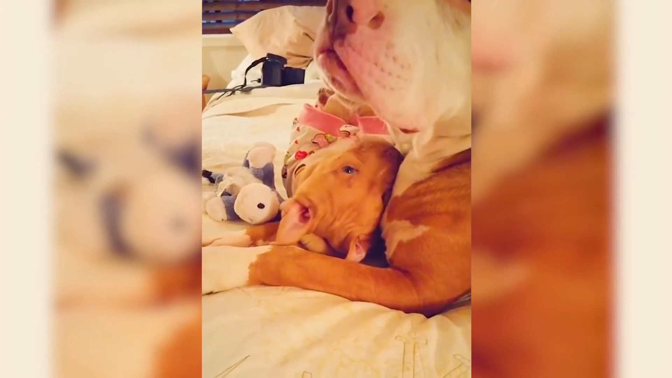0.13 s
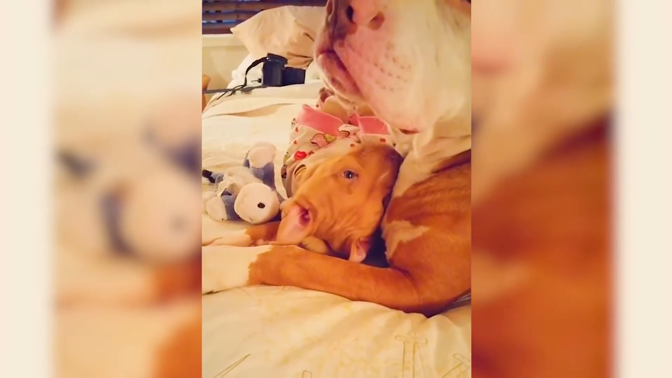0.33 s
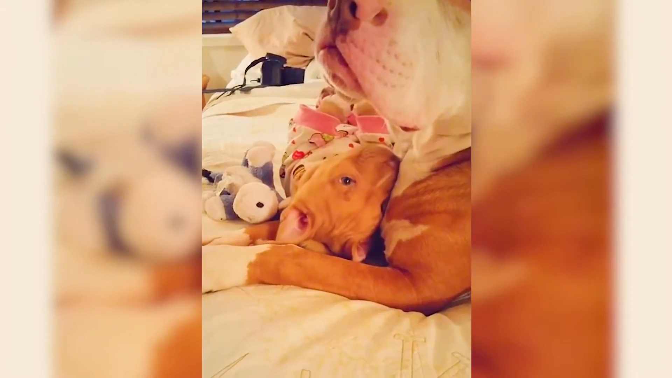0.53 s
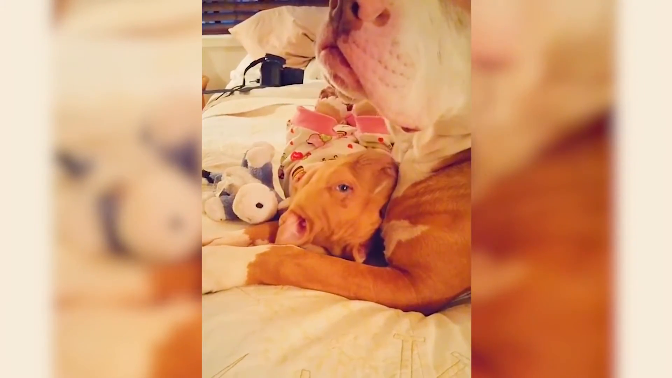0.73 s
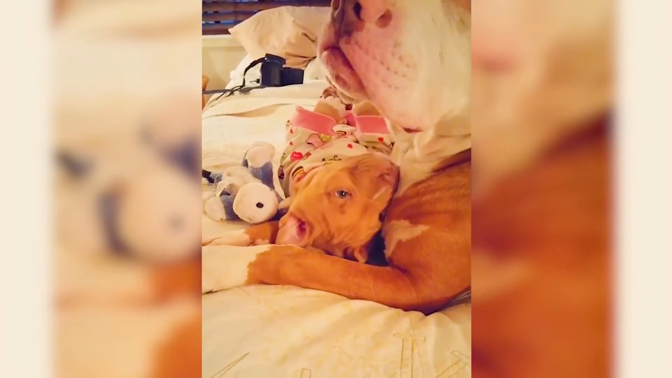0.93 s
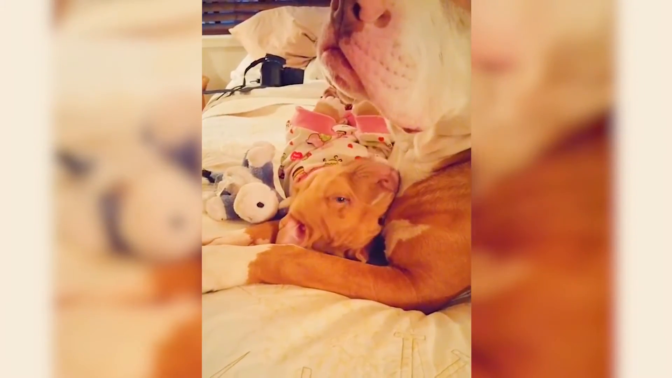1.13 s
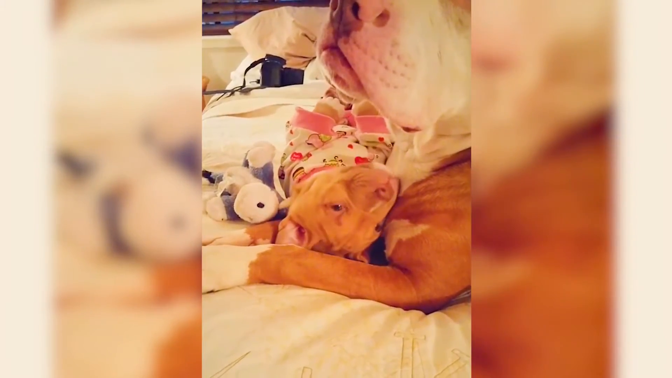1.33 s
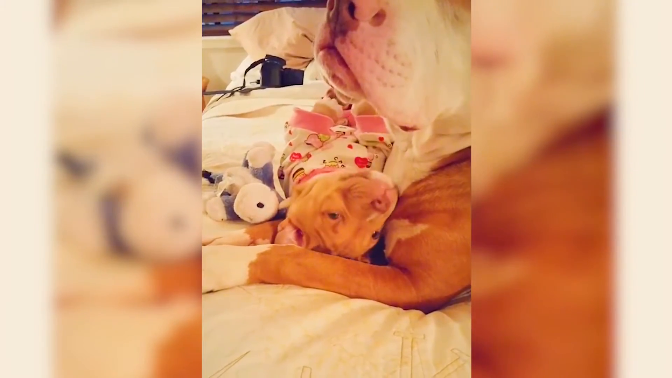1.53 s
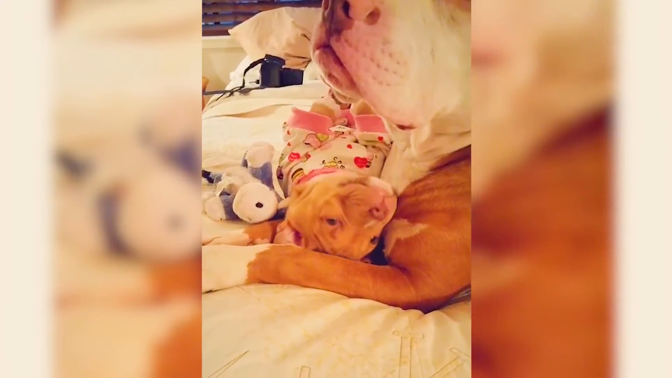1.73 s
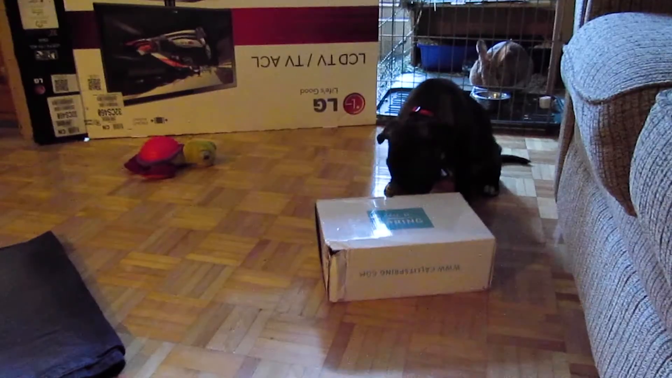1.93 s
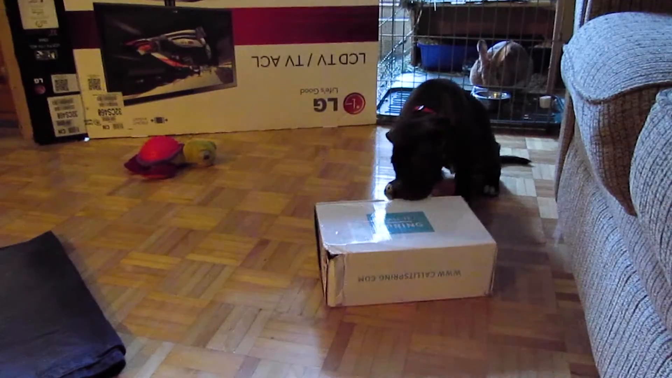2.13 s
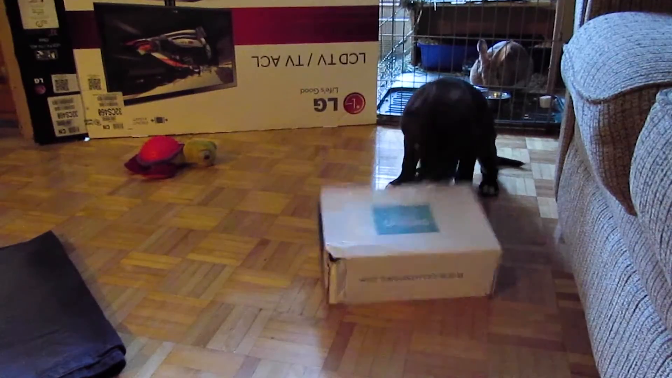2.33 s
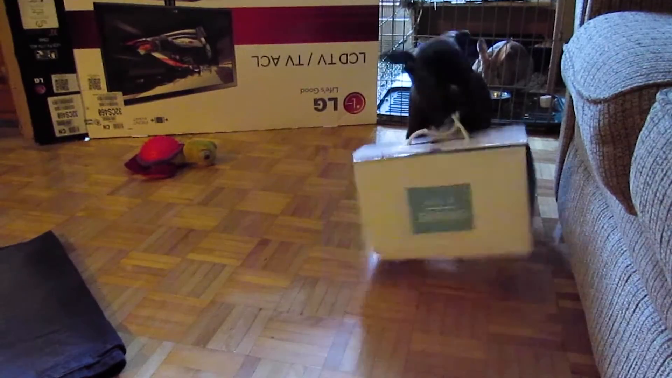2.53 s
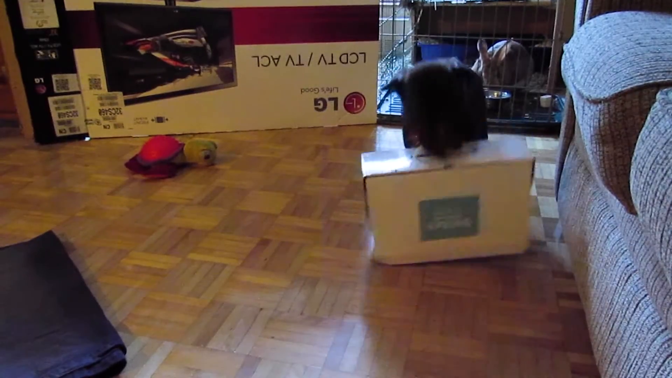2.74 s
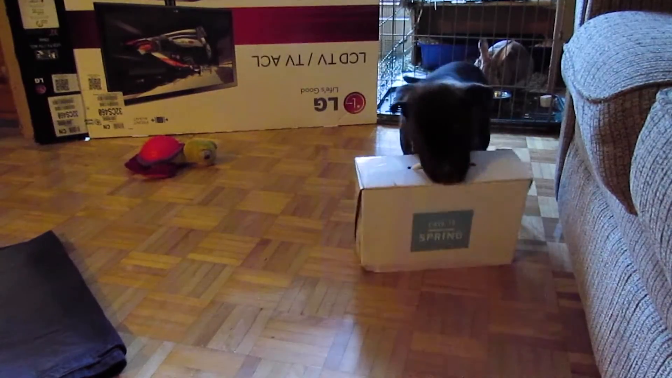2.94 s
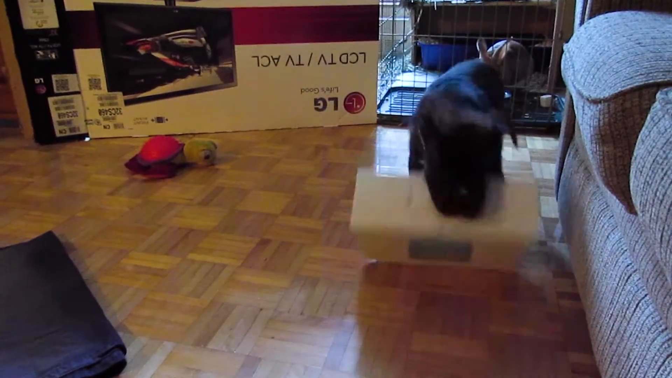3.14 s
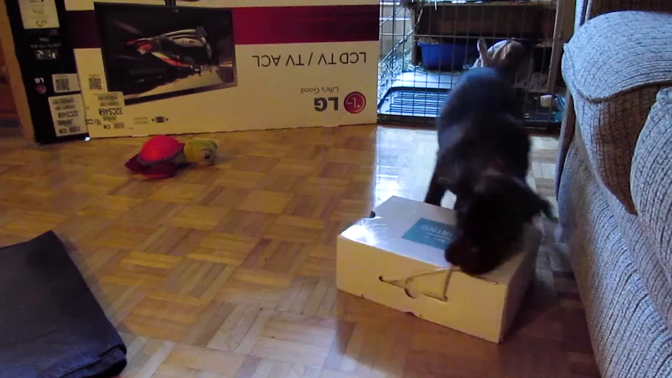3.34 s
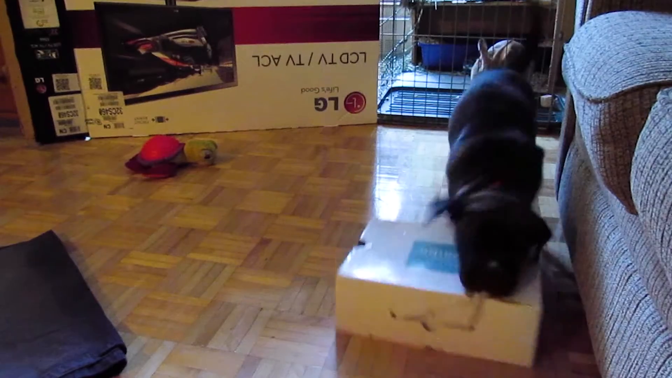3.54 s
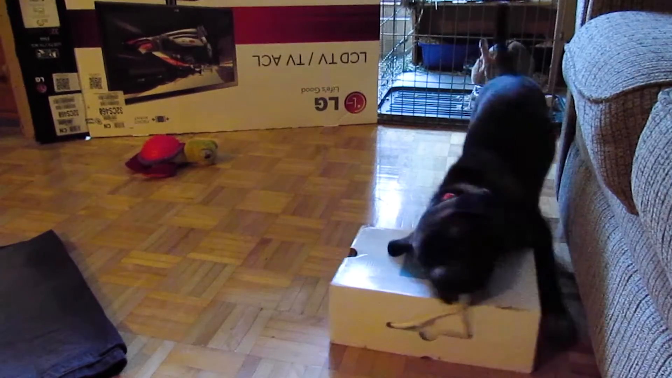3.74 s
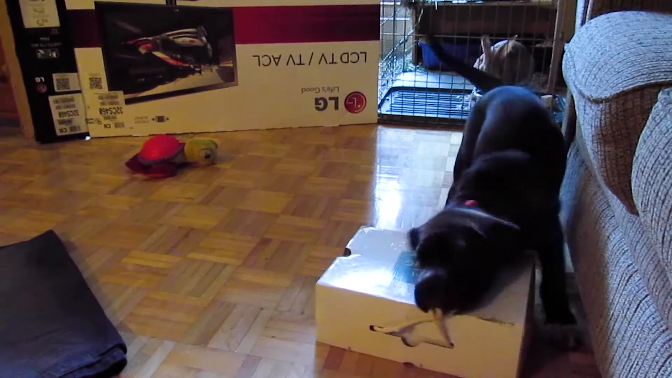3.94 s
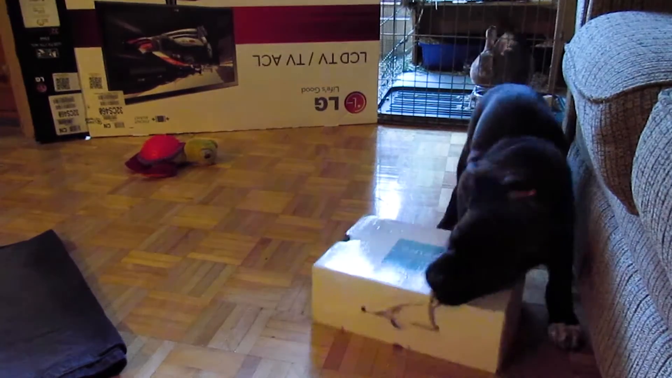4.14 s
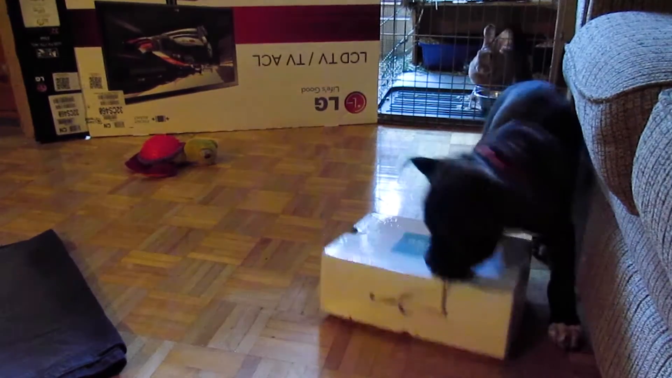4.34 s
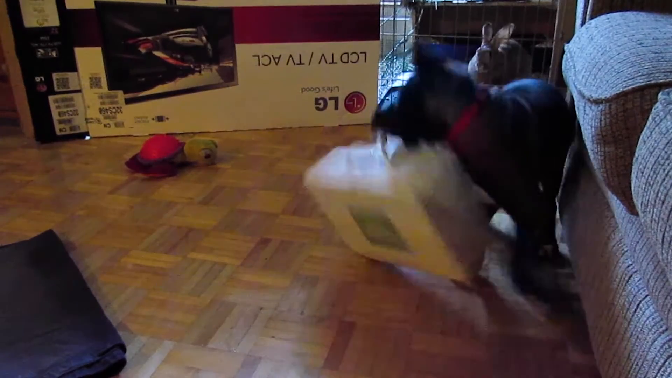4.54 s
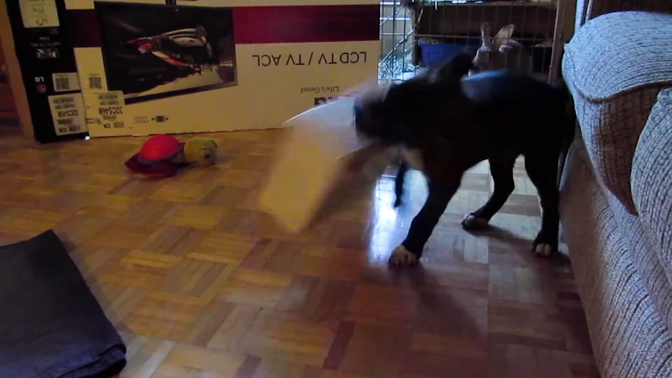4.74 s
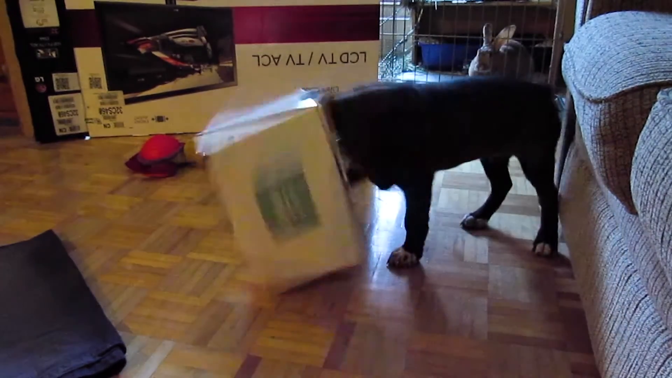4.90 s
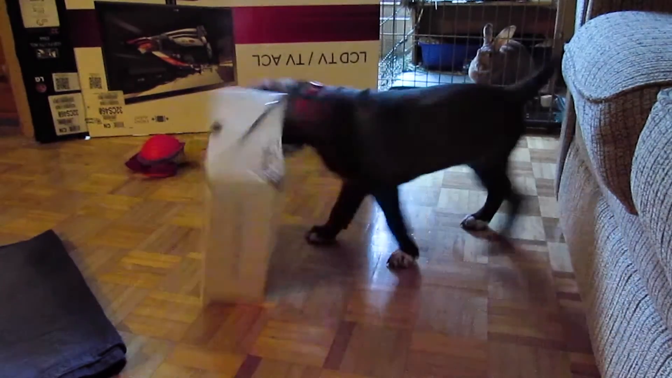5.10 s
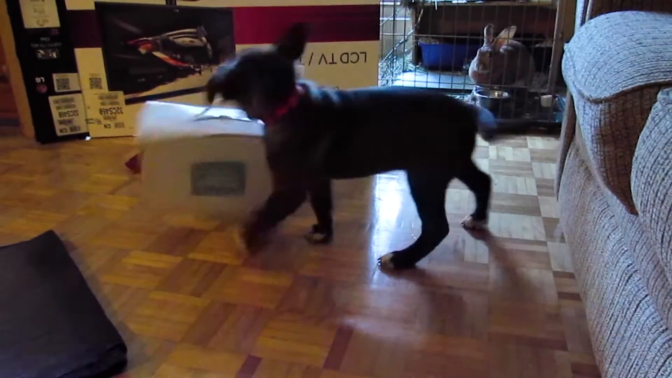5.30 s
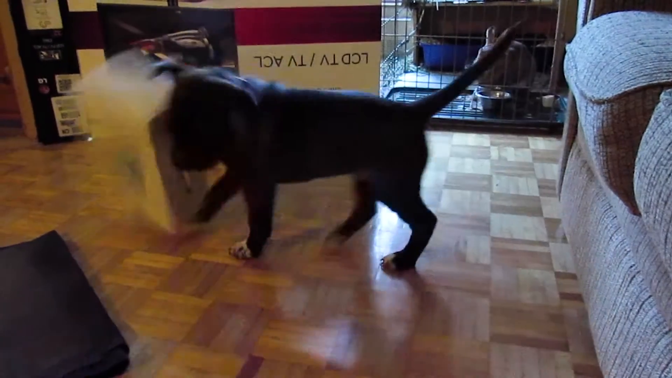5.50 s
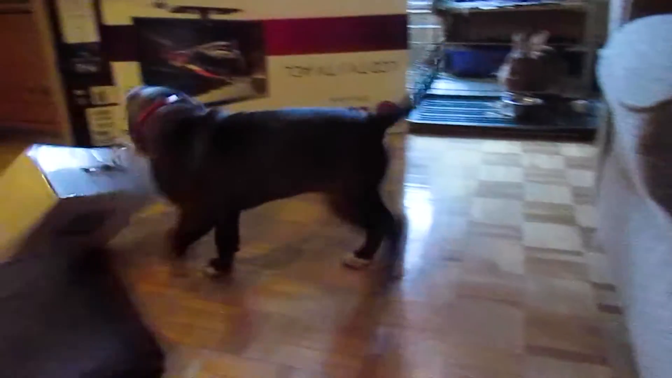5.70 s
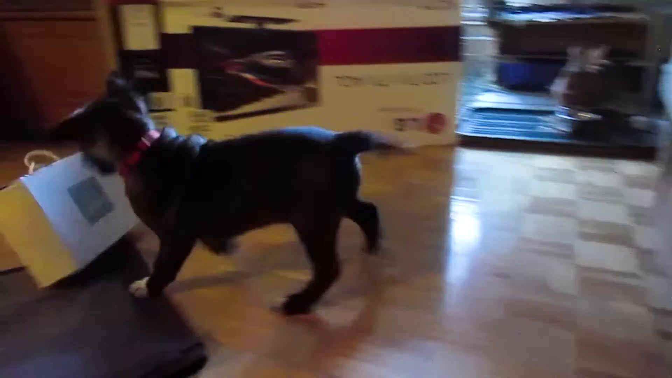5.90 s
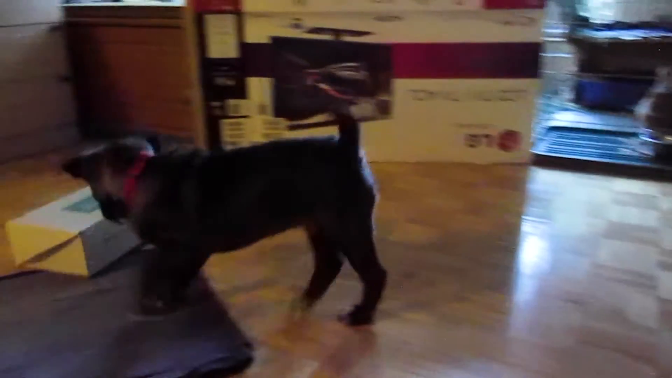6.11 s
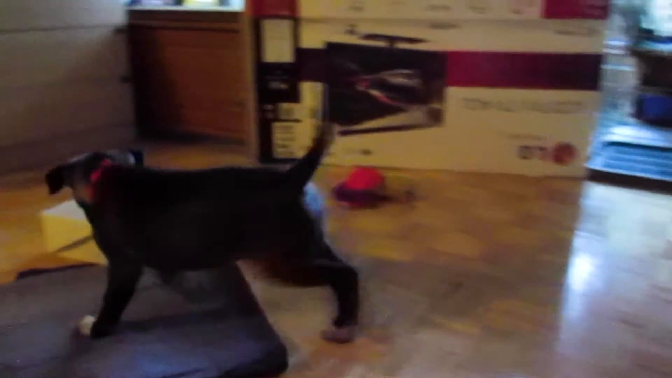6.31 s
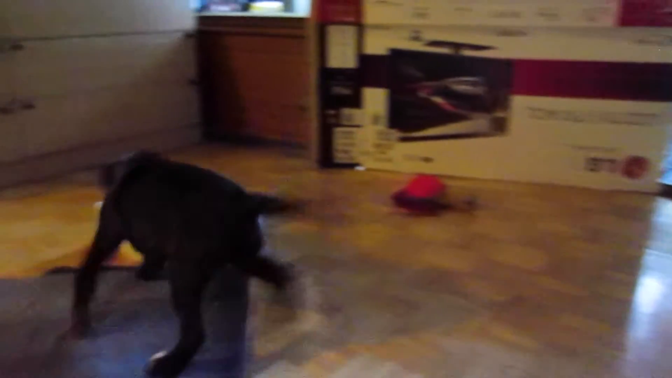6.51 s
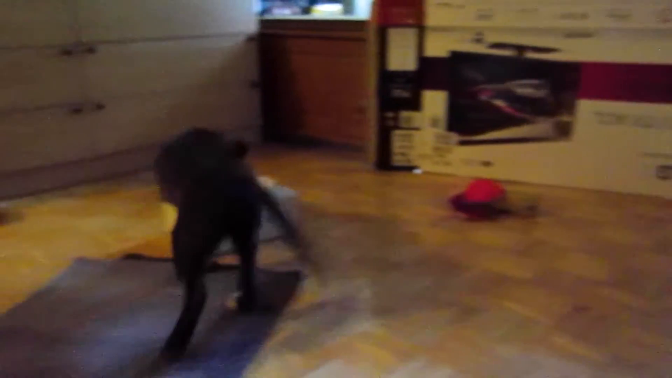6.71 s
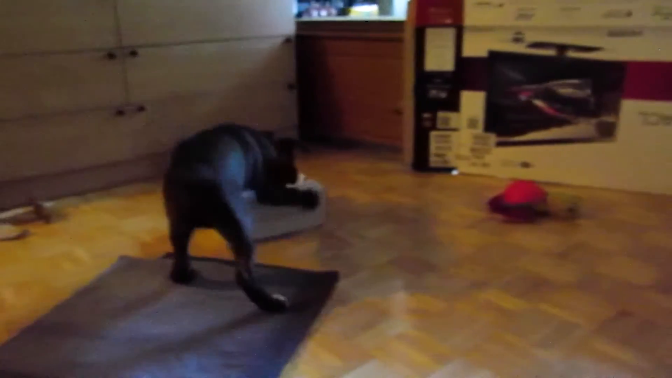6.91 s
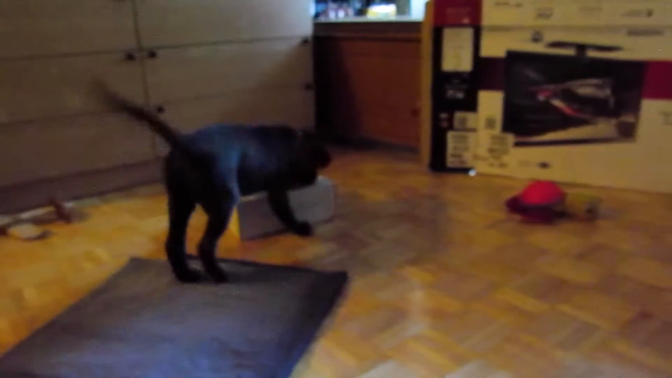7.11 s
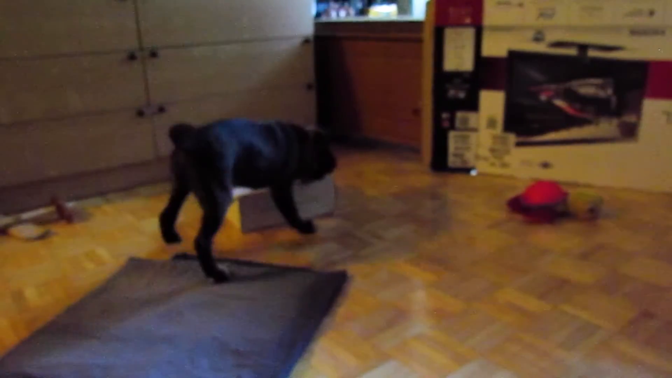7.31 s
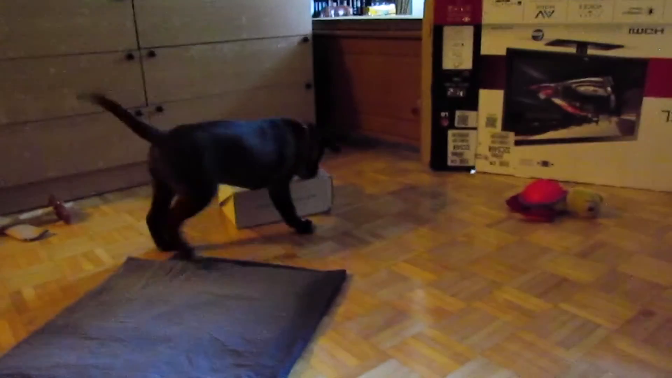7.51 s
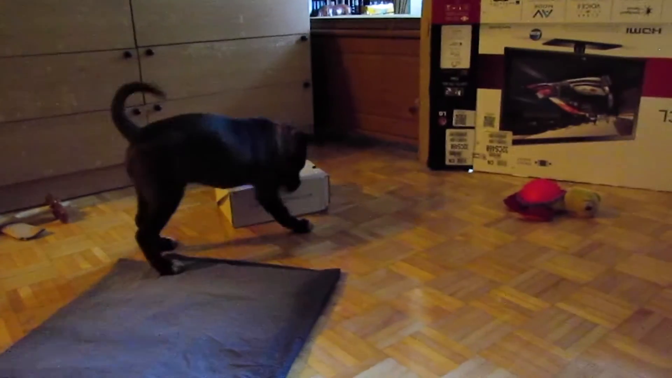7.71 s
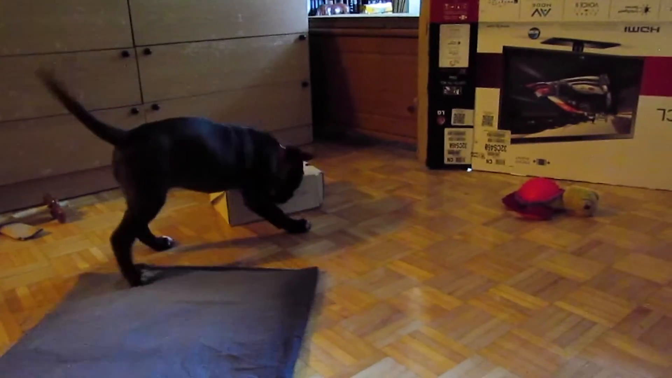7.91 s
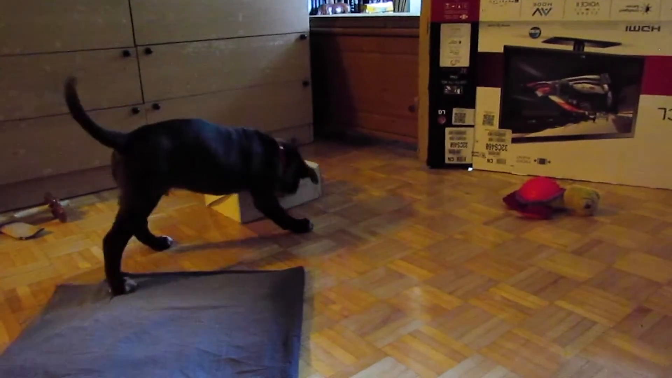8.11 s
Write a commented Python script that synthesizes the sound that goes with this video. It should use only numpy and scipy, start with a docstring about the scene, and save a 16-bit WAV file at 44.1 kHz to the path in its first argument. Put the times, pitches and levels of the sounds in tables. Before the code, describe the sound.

Near-silent room tone cuts to cardboard thumping and scraping over hard wooden floor, claws ticking sharply, bursts gradually thinning into scuffs.

```python
"""Puppy wrestling a cardboard box

A moment of quiet bedroom air, then a cut to a living room where a puppy wrestles a cardboard box over parquet.
Decaying modes, noise crunches and damped sines make the knocks; filtered ticks make the claws and flaps.
Grainy noise makes the rubbing and squeaks, high sines a collar tag, shaped noise the rumble and room air.
Noise tails that die band by band let the small room answer the blows and clicks."""
import sys
import numpy as np
from scipy import signal
from scipy.fft import rfft, irfft
from scipy.io import wavfile
from scipy.ndimage import uniform_filter1d

SR = 44100
rng = np.random.default_rng(int(sys.argv[2]) if len(sys.argv) > 2 else 0)


def transcribe(u):
    """Save the signal u as a 16-bit wav file named by the first command-line argument.

    u: samples, shape (n,) or (channels, n), limited to [-1, 1]; the rate is SR.
    q: integer samples, one column per channel.
    """
    v = np.clip(np.atleast_2d(u).T, -1, 1)
    q = np.round(v * 32767).astype(np.int16)
    wavfile.write(sys.argv[1], SR, q)


N = 359415

CUT_S = 1.812  # bedroom before, living room after
PORTS_HZ = 2360  # above this the two microphone ports hear diffuse sound differently


def undb(db):
    """Decibels to gain."""
    return 10 ** (np.asarray(db) / 20)


def unit(x):
    """Scale to rms 1."""
    return x / np.sqrt(np.mean(x ** 2))


def band(x, hz, width):
    """One resonance, gain 1 at the centre."""
    return signal.lfilter(*signal.iirpeak(hz, hz / width, fs=SR), x)


def fade(t, t60):
    """Envelope that falls 60 dB in t60 seconds."""
    return np.exp(-np.log(1000) * t / t60)


def attack(t, seconds):
    """Exponential rise towards 1 with this time constant."""
    return 1 - np.exp(-t / seconds)


def add(out, s, sound):
    """Mix a short sound in at time s."""
    i = int(s * SR)
    out[..., i:i + sound.shape[-1]] += sound[..., :N - i]


def walk(rate):
    """Random levels, drawn rate times a second and joined by slews; spread near 1."""
    k = int(SR / rate)
    held = np.repeat(rng.standard_normal(N // k + 1), k)
    return 1.2 * uniform_filter1d(held, k)[:N]


def diffuse(make, side_db):
    """Two ports close together: alike in the bass, partly unrelated in the treble."""
    side = signal.lfilter(*signal.butter(1, PORTS_HZ, "high", fs=SR), make())
    return make() + undb(side_db) * side * np.array([[1], [-1]])


def air(points, flicker_db):
    """Steady noise of a given colour, rms near 1, that flickers slightly."""
    hz, db = np.transpose(points)
    bins_hz = np.arange(N // 2 + 1) * SR / N
    shape = undb(np.interp(np.log(bins_hz + 1), np.log(hz), db))
    noise = irfft(rfft(rng.standard_normal(N)) * shape, N)
    return unit(noise) * undb(flicker_db * walk(8))


# Box against floor and paws. Each row: start in seconds, blow level in dB, thump pitch in Hz,
# thump, crunch and floorboard levels in dB relative to the blow, ring in seconds.
KNOCKS = [(2.504, -21, 250, -2, -28, -9, 0.09), (2.601, -13.5, 433, -20, 5, -15, 0.092),
          (2.638, -7, 557, -10, -8.5, -21.5, 0.095), (2.712, -22, 390, -17, 2.5, -26, 0.043),
          (2.821, 4.5, 460, -3.5, -13, -50, 0.034), (2.86, -2, 437, -10.5, -14, -23.5, 0.069),
          (2.999, -27.5, 420, -5, 4.5, -33, 0.081), (3.043, -23.5, 522, -3, -1, -28, .07),
          (3.146, -26, 610, -11, 2, -39, 0.1), (3.216, -6.5, 487, -12.5, -16.5, -33, 0.084),
          (3.259, -24, 468, -9, -10, -11, 0.051), (3.357, -3, 275, -6.5, -21, -37, .06),
          (3.373, -8.5, 320, -2, -4, -31, 0.033), (3.383, 0.5, 405, -6.5, -14.5, -47, 0.11),
          (3.451, -5, 204, 4, -14.5, -35, 0.078), (3.529, -15, 240, -12, -12.5, -24, 0.15),
          (3.59, -20, 563, 3, 0.5, -36, 0.037), (3.611, -22.5, 648, -4, 5, -33, .11),
          (3.63, -25.5, 600, -6, 2.5, -30, .06), (3.646, -21, 320, 0, -13, -13, 0.047),
          (3.678, -7, 330, -6, -15, -40, 0.068), (3.744, -25, 302, -3, -22, -26, .085),
          (3.777, -23.5, 337, 2, -1, -28, .062), (3.799, -18.5, 244, -1, -13, -32, 0.043),
          (4.151, -28.5, 335, -4.5, -26, -9, .12), (4.219, -19, 230, -5.5, -28, -22, 0.05),
          (4.489, -30, 150, -5, -21, -6, 0.076), (4.594, -12, 418, -7, -4.5, -20, 0.061),
          (4.685, -13, 147, -10, -12.5, -15.5, .11), (4.75, 5.5, 468, -5.5, -12, -34, 0.048),
          (4.847, -12.5, 383, -13, 0, -35, 0.059), (4.953, -1.5, 518, -12.5, -7.5, -22, 0.082),
          (5.021, -10, 164, -15, -15.5, -30, 0.12), (5.192, -8.5, 163, -8, -6, -18.5, 0.12),
          (5.288, -18, 450, -2, 1, -18, 0.044), (5.441, -4.5, 460, -20, -8.5, -30, .13),
          (5.5, -7.5, 460, -8, -19, -34, 0.038), (5.587, -1, 264, -15.5, -4.5, -14.5, 0.049),
          (5.712, -10.5, 237, -14, -18, -31, 0.099), (5.843, -24, 155, 0.5, -39, -18, 0.13),
          (5.888, -26.5, 590, -10, 3, -30, 0.047), (5.897, -16.5, 460, -6.5, -6.5, -24, 0.1),
          (6.058, -42.5, 390, -4, 3, -18, 0.13), (6.124, 1, 494, -8.5, -9, -40, 0.096),
          (6.131, -5, 256, -6.5, -8.5, -42, .04), (6.453, -35.5, 175, -5, 2, -34, .095),
          (6.736, -13.5, 276, -9.5, -27, -21, 0.098), (6.86, -31, 404, -6, -7, -30, .08),
          (6.924, -28.5, 363, -3.5, -27, -36, 0.18), (6.975, -24.5, 158, -0.5, -21, -14, 0.068),
          (7.846, -36.5, 173, 2.5, -25, -25, 0.077)]
# Walls and air of the box. Each row: mode in Hz, relative level in dB, t60 in seconds at a ring of 0.14 s.
BOX_MODES = [(150, -3.5, 0.12), (209.5, -1, 0.07), (268.3, 0, 0.16), (325, -1, 0.088), (361, -2, 0.12),
             (412, 4.5, 0.098), (460, -4.5, 0.096), (505.4, -19, 0.32), (588, -4, 0.14), (718, -26.5, 0.11),
             (753.5, -6, 0.098), (858, -6, 0.11), (1000, -6.5, 0.033)]
# Cardboard crunch above the clear modes. Each row: centre in Hz, width in Hz, relative level in dB.
CRUNCH_BANDS = [(400, 360, -10), (850, 270, -7.5), (1264, 520, -7), (2500, 590, -18)]
CONTACT_S, CRACK_S = 0.0018, 0.00054  # the crunch starts faster than the walls swing
BOARDS_HZ, BOARDS_T60_S = 94.3, 0.33


def crunch_noise(t, ring):
    """Crumpling cardboard: banded noise whose level jumps in fits as loose flaps rattle."""
    fits = undb(3.4 * np.repeat(rng.standard_normal(len(t) // 150), 150))
    crunch = np.zeros(len(t))
    for hz, width, db in CRUNCH_BANDS:
        noise = band(fits * rng.standard_normal(len(t)), hz, width)
        crunch += undb(db) * unit(noise * fade(t, ring))
    # unit() lifts short bursts; the root evens out their starting level
    return crunch * np.sqrt(0.14 * ring) * attack(t, CRACK_S)


def knocks():
    """Each blow: a thump of the struck panel, the box modes in a new mix, a crunch and a boom of the floorboards."""
    out, thumps = np.zeros(N), np.zeros(N)
    t = np.arange(SR // 2) / SR
    hz, mode_db, t60 = (c[:, None] for c in np.transpose(BOX_MODES))
    contact = attack(t, CONTACT_S)
    boards = np.sin(2 * np.pi * BOARDS_HZ * t) * fade(t, BOARDS_T60_S) * attack(t, 0.0022)
    for s, db, thump_hz, thump_db, crunch_db, boards_db, ring in KNOCKS:
        # random detune, phase and level of every mode
        detune, phase, level = rng.standard_normal((3, len(BOX_MODES), 1))
        swing = np.sin(2 * np.pi * hz * (1 + 0.032 * detune) * t + 2 * phase)
        modes = np.sum(undb(mode_db + 2.9 * level) * swing * fade(t, t60 * ring / 0.14), axis=0)
        box = undb(-17) * contact * modes + undb(crunch_db) * crunch_noise(t, ring)
        add(out, s, undb(db) * (box + undb(boards_db) * boards))
        # a few cycles, then the paw damps it
        thump = np.sin(2 * np.pi * thump_hz * t) * np.exp(-(t / (0.16 * ring)) ** 2)
        add(thumps, s, undb(db + thump_db) * contact * thump)
    return out, thumps


# Claws on parquet and snapping flaps. Each row: start in seconds, level in dB, centre in Hz,
# t60 of the rattle in seconds.
CLICKS = [(1.865, -45, 9000, 0.013), (2.4125, -26, 2710, .035), (2.467, -25, 3990, 0.046),
          (2.494, -22, 2760, 0.042), (2.555, -33, 7380, .024), (2.604, -1.5, 2460, 0.063),
          (2.6388, 1.5, 2000, 0.032), (2.7134, -27, 2000, .03), (2.8221, -10, 2000, .047),
          (2.8603, -8, 2700, 0.11), (3.0005, -16, 2090, 0.028), (3.046, -11, 3080, 0.023),
          (3.13, -22, 3100, .079), (3.147, -13.5, 2560, 0.054), (3.279, -20, 9910, .027),
          (3.3561, -11.5, 2580, .04), (3.379, -3, 2760, 0.022), (3.3875, -16, 2760, 0.026),
          (3.4334, -11, 2540, 0.026), (3.6107, -6, 2260, 0.014), (3.68, -15.5, 2020, .033),
          (3.7761, -13.5, 2290, 0.034), (3.813, -20, 3530, 0.045), (4.5928, -9, 2250, 0.061),
          (4.661, -16, 3540, .03), (4.684, -12, 2410, 0.024), (4.7534, 0.5, 2100, 0.013),
          (4.8477, 2.2, 2530, 0.0091), (4.907, -9, 2240, 0.025), (4.9528, -3.5, 2820, 0.039),
          (5.027, -2, 1890, 0.0081), (5.1917, 3.5, 3930, 0.016), (5.2912, 3.5, 2370, 0.012),
          (5.4392, -10.5, 2380, 0.21), (5.5, -18, 11000, 0.022), (5.5424, -21, 10400, .028),
          (5.5877, 1, 2000, 0.057), (5.7082, -13.5, 2060, .022), (5.8883, -18, 2960, 0.066),
          (6.1228, 0, 2020, 0.029), (6.2775, -17, 2000, 0.021), (6.4465, -34, 3390, 0.027),
          (6.7416, -12, 2110, 0.14), (6.9254, -18, 9470, .043), (6.9764, -8, 2740, 0.025),
          (7.021, -10, 9300, 0.0053), (7.2836, -13.5, 2020, .09), (7.49, -34, 8500, .015),
          (7.567, -29, 12000, .012), (7.727, -37, 9000, .012), (7.859, -27, 8500, .03),
          (7.954, -23.5, 2350, .04), (8.0425, -34, 12000, .012)]
CLAW_PAN_DB = 2.5  # scatter of the level difference between left and right
SOFA_ECHO_S, SOFA_ECHO_DB = .0052, -9


def clicks():
    """A sharp tick, its first echo off nearby furniture, and a short rattle that scatters between the ports."""
    out, t = np.zeros((2, N)), np.arange(SR // 5) / SR
    touch = 1. * (t == 0)
    for s, db, hz, rattle in CLICKS:
        chatter = diffuse(lambda: rng.standard_normal(len(t)), -3.5) * fade(t, rattle) * attack(t, 0.0004)
        chatter = chatter * (1 + 1.55 * fade(t, 0.005))  # hardest early on
        burst = undb(5.5) * touch + undb(-8.0) * chatter
        tick = band(burst, hz, 0.58 * hz) + 0.33 * band(burst, 6900, 4100)
        tick = tick + 0.62 * band(touch, 8800, 6000)  # the first touch is brightest
        pan_db = CLAW_PAN_DB * rng.standard_normal() * np.array([[.5], [-.5]])
        tick = undb(db + pan_db) * tick
        add(out, s, tick)
        add(out, s + SOFA_ECHO_S, undb(SOFA_ECHO_DB) * tick[::-1])  # echo with sides swapped
    return out


# Strokes of cardboard and paws over the floor. Each row: loudest moment in seconds, swell in seconds,
# fade in seconds, drag on the box walls in dB, rasp in dB, fine hiss in dB.
SCUFFS = [(1.995, 0.036, 0.082, -55, -49, -47.5), (2.215, 0.055, 0.037, -62, -57, -59),
          (2.44, 0.087, 0.056, -54, -49.5, -45.5), (2.515, 0.015, 0.036, -39, -53, -68),
          (2.63, 0.032, 0.053, -37, -57, -58), (2.764, 0.066, 0.15, -50, -50, -43.5),
          (3.2, .12, 0.09, -38.5, -40, -42.5), (3.54, 0.16, 0.12, -33, -45.5, -39.5),
          (3.8, 0.13, 0.049, -41.5, -45, -43), (3.91, 0.12, 0.065, -48, -44, -44.5),
          (4.051, 0.041, 0.072, -39, -46, -47), (4.16, 0.084, 0.11, -53, -40, -40.5),
          (4.47, 0.066, 0.12, -53.5, -50.5, -50), (4.639, 0.039, 0.068, -38.5, -41.5, -37),
          (4.912, 0.075, 0.092, -34.5, -41.5, -55), (5.04, 0.044, 0.059, -38.5, -62, -46),
          (5.276, 0.11, 0.14, -53, -45.5, -50), (5.55, 0.085, 0.061, -50, -55, -44),
          (5.716, 0.047, 0.069, -42, -41.5, -47), (5.92, 0.08, 0.06, -47, -45, -54),
          (6.25, 0.2, 0.082, -47, -53, -53), (6.46, 0.043, 0.074, -55, -44.5, -51),
          (6.55, 0.063, 0.085, -40.5, -45.5, -50.5), (6.7, 0.039, 0.035, -75, -62, -41.5),
          (6.748, .012, 0.048, -28.5, -32.5, -34.5), (6.88, 0.072, 0.036, -41, -38.5, -36.5),
          (6.935, 0.019, 0.037, -35.5, -44, -31.5), (6.99, .04, 0.072, -41.5, -38, -36),
          (7.25, 0.11, .04, -42.5, -42, -38.5), (7.31, 0.042, 0.08, -44, -43, -38.5),
          (7.56, 0.11, 0.066, -52, -53.5, -52), (7.7, 0.055, 0.057, -50.5, -65, -53),
          (7.865, 0.028, 0.18, -40.5, -52, -45), (8.14, 0.08, .05, -36, -39.5, -41)]
# Faint shuffling between strokes, one row: drag, rasp and hiss levels in dB.
REST_DB = (-60.5, -55.5, -63)
STROKE_SHAPE = 1.98  # 1 = pointed stroke, 2 = rounded


def strokes():
    """Pressure of the rubbing on its three layers: every stroke swells to its loudest moment and fades."""
    t = np.arange(N) / SR
    out = undb(REST_DB)[:, None] * np.ones(N)
    for s, swell, ebb, *db in SCUFFS:
        distance = abs(t - s) / np.where(t < s, swell, ebb)
        out += undb(db)[:, None] * np.exp(-distance ** STROKE_SHAPE)
    return out


# Coarse scratching. Each row: centre in Hz, width in Hz, relative level in dB.
RASP_BANDS = [(1630, 2180, 11.5), (3150, 460, -1)]
# Fine hiss along the varnish. Each row: centre in Hz, width in Hz, relative level in dB.
HISS_BANDS = [(6530, 5600, 15), (9730, 5500, 22), (12000, 4000, -30)]


def rub():
    """Dense slips of uneven size shake the box walls and hiss along the varnish."""
    drag, rasp, hiss = strokes()
    judder = undb(1.2 * walk(40))

    def slips(grain_db):
        size = np.minimum(rng.exponential(size=N), 7.5)
        return rng.standard_normal(N) * undb(grain_db * size) * judder

    def friction(bands, grain_db):
        return unit(sum(undb(db) * band(slips(grain_db), hz, width) for hz, width, db in bands))

    # wide resonances: the rubbing damps the walls
    walls = sum(undb(db) * band(slips(3.66), hz, 9 / t60) for hz, db, t60 in BOX_MODES)
    scratch = diffuse(lambda: rasp * friction(RASP_BANDS, 2.4), -3.5)
    fine = diffuse(lambda: hiss * friction(HISS_BANDS, 3.1), -2.6)
    return drag * undb(1.26 * walk(60)) * unit(walls) + scratch + fine


# An edge catches and sings briefly. Each row: start in seconds, time scale in seconds, pitch in Hz,
# width in Hz, level in dB.
SQUEAKS = [(2.376, 0.014, 2660, 150, -47), (2.398, 0.037, 2690, 150, -46), (3.15, 0.02, 1790, 200, -33.5),
           (3.326, 0.019, 2200, 500, -39), (6.391, 0.011, 2960, 800, -44.5), (6.51, 0.094, 426, 60.3, -35),
           (7.288, 0.016, 1680, 500, -32), (7.947, 0.034, 1130, 300, -43.5),
           (5.302, 0.048, 2200, 700, -33.5)]


def squeaks():
    """Short narrow bands of friction that swell and die."""
    out = np.zeros(N)
    for s, length, hz, width, db in SQUEAKS:
        t = np.arange(SR // 4) / SR / length
        tone = unit(band(band(rng.standard_normal(len(t)), hz, width), hz, width))
        swell = 4 * t * np.exp(-2.5 * t ** 2)
        add(out, s, undb(db) * tone * swell)
    return out


# The collar tag tinkles. Each row: start in seconds, level in dB.
TINKLES = [(3.405, -36), (5.543, -26)]
# Ringing of the tag. Each row: mode in Hz, relative level in dB, t60 in seconds.
TAG_MODES = [(10450, -7, .1), (13130, 1, 0.13)]


def tag():
    """A small metal tag rings very high."""
    out, t = np.zeros(N), np.arange(SR // 4) / SR
    ring = sum(undb(db) * np.sin(2 * np.pi * hz * t) * fade(t, t60) for hz, db, t60 in TAG_MODES)
    for s, db in TINKLES:
        add(out, s, undb(db) * ring)
    return out


# Reverberation of the living room. Each row: centre in Hz, t60 in seconds, relative level in dB.
ROOM_BANDS = [(130, 0.15, 5.5), (250, 0.35, -1.5), (500, 0.29, 0.5), (920, 0.24, -1), (2000, 0.37, -4.5),
              (4200, 0.36, -3), (7360, 0.21, -3), (13300, 0.18, -1.5)]
ROOM_DB, THUMP_WET_DB = -6, -4
MOVE_S = .05  # a new echo pattern is drawn this often


def room(x):
    """Echoes thicken into a tail that dies band by band; their pattern keeps changing."""
    out, t, step = np.zeros((2, N)), np.arange(SR // 2) / SR, int(MOVE_S * SR)

    def tail():
        y = sum(undb(db) * band(rng.standard_normal(len(t)), hz, 0.77 * hz) * fade(t, t60)
                for hz, t60, db in ROOM_BANDS)
        y = y * attack(t, 0.0026)
        return y / np.sqrt(np.sum(y ** 2))  # energy 1

    for i in range(int(CUT_S * SR), N, step):
        echoes = signal.fftconvolve(diffuse(tail, -0.77), x[None, i:i + step], axes=1)
        add(out, (i + .5) / SR, echoes)  # half a sample guards against rounding down
    return undb(ROOM_DB) * out


# Low rumble under the living room. Each row: time in seconds, level in dB.
RUMBLE = [(1.9, -56), (2.02, -48.5), (2.73, -52), (3.0, -51.5), (5.2, -54), (5.63, -54), (6.15, -70),
          (8.1, -52)]


def rumble():
    """A deep, unsteady rumble, nearly alike at both ports."""
    s, db = np.transpose(RUMBLE)
    mid, side = [unit(band(band(rng.standard_normal(N), 55, 60), 55, 60)) for _ in range(2)]
    level = undb(np.interp(np.arange(N) / SR, s, db) - 0.5 + 1.6 * walk(5))
    return level * (mid + undb(-13) * side * np.array([[1], [-1]]))


# Colour of the living room air. Each row: frequency in Hz, relative level in dB per Hz.
LOUNGE = [(15, -30), (25, 0), (60, -2.5), (102, 6), (236, -5.5), (962, -12.5), (1440, -19.5), (2690, -25.5),
          (5730, -40), (9570, -45), (12500, -26), (16000, -56)]
LOUNGE_DB = -47.5


def lounge_air():
    """Coloured noise whose treble spreads widely between the ports."""
    return undb(LOUNGE_DB) * diffuse(lambda: air(LOUNGE, 1.9), 5.4)


# Colour of the bedroom air. Each row: frequency in Hz, relative level in dB per Hz.
BEDROOM = [(15, -65), (25, -33), (74, -23), (105, -9.5), (134, -22), (153, -7.5), (185, -12.5), (293, -4.5),
           (326, -6), (427, -8), (695, -16), (6210, -42), (16000, -65)]
BEDROOM_DB = -52


def bedroom_air():
    """Quiet coloured noise, the same at both ports and almost steady."""
    return undb(BEDROOM_DB) * air(BEDROOM, 0.37)


def scene():
    """Bedroom air until the cut, then the living room."""
    after = np.arange(N) >= CUT_S * SR
    box, thumps = knocks()
    hits = box + clicks()
    # the thump is a near sound; less of it reaches the walls
    wet = room(hits.mean(axis=0) + undb(THUMP_WET_DB) * thumps)
    lounge = hits + thumps + wet + rub() + squeaks() + tag() + rumble() + lounge_air()
    return np.where(after, lounge, bedroom_air())


MIC_THIN_HZ, MIC_DULL_HZ, TOP_HZ = 38.2, 10830, 16000
CLIP = .9  # full scale is 1


def record(dry):
    """The microphone is thin in the deep bass and dull at the top; the loudest peaks clip; the top is cut."""
    mic_sos = signal.butter(2, [MIC_THIN_HZ, MIC_DULL_HZ], "band", fs=SR, output="sos")
    mic = signal.sosfilt(mic_sos, dry)
    top_sos = signal.ellip(8, .2, 60, TOP_HZ, fs=SR, output="sos")
    return signal.sosfilt(top_sos, np.clip(mic, -CLIP, CLIP))


dry = scene()
out = record(dry)
transcribe(out)
```